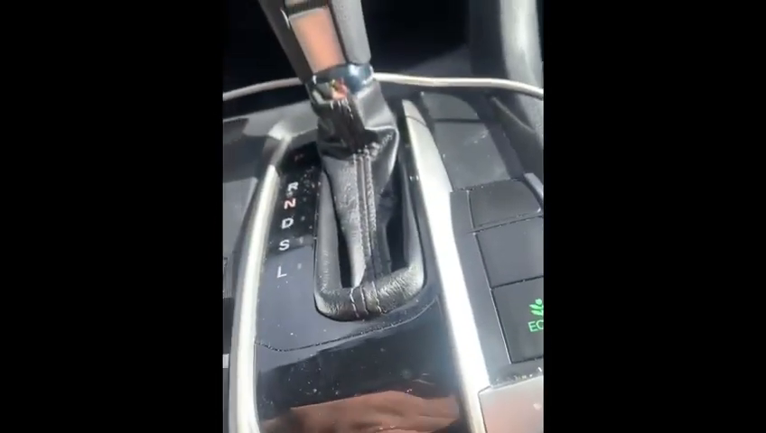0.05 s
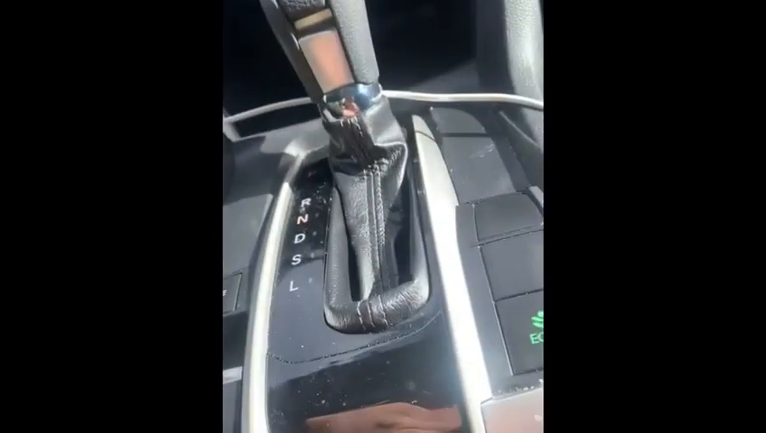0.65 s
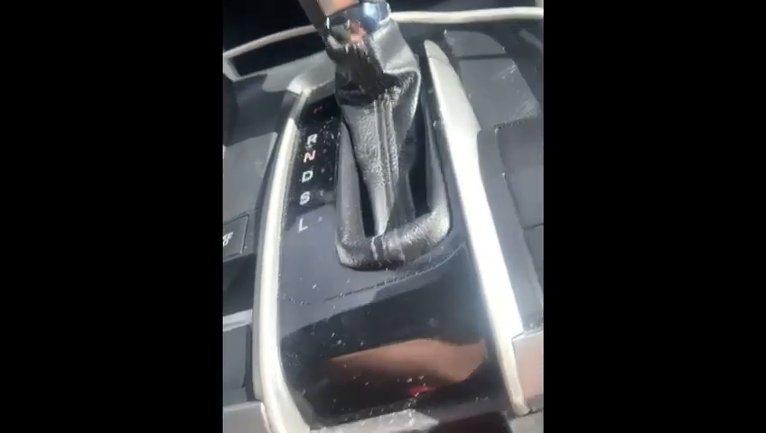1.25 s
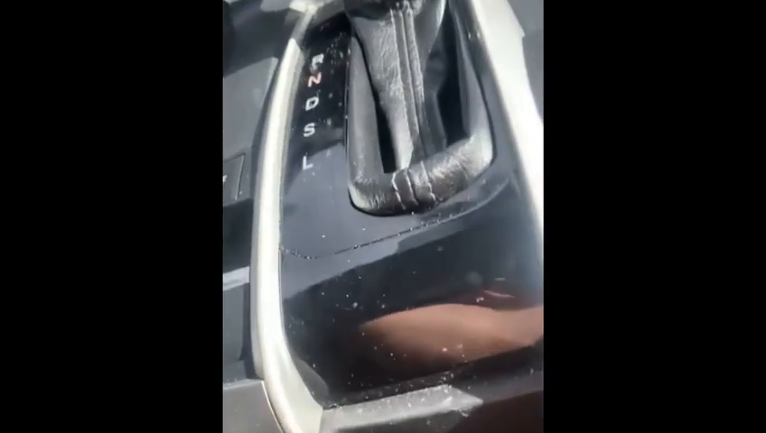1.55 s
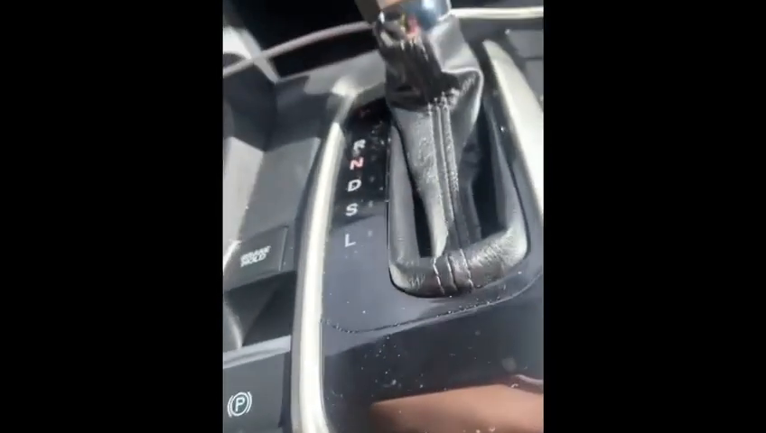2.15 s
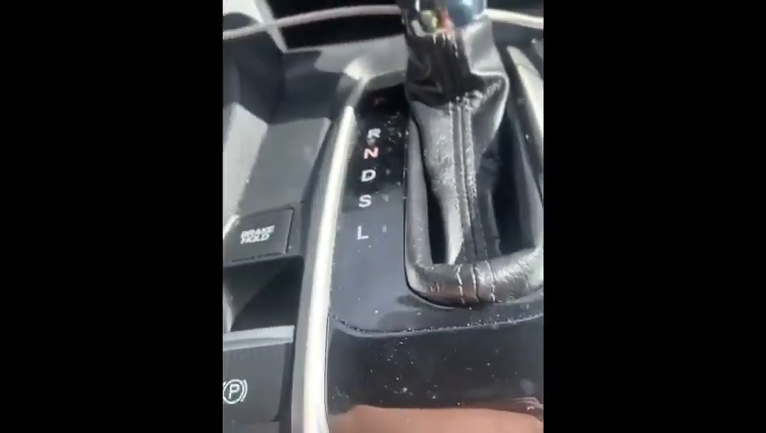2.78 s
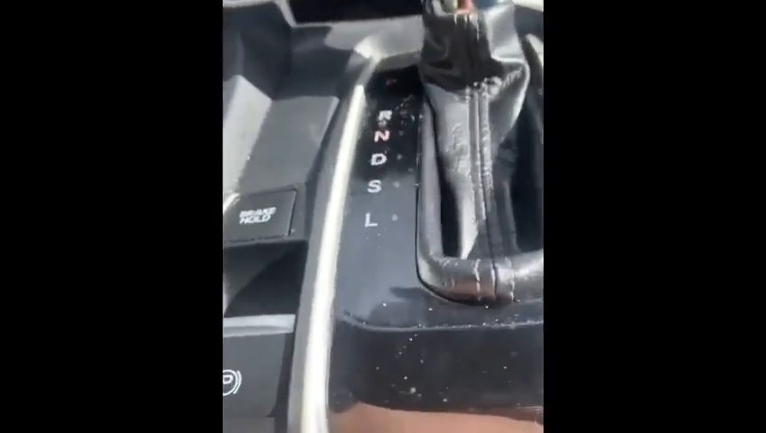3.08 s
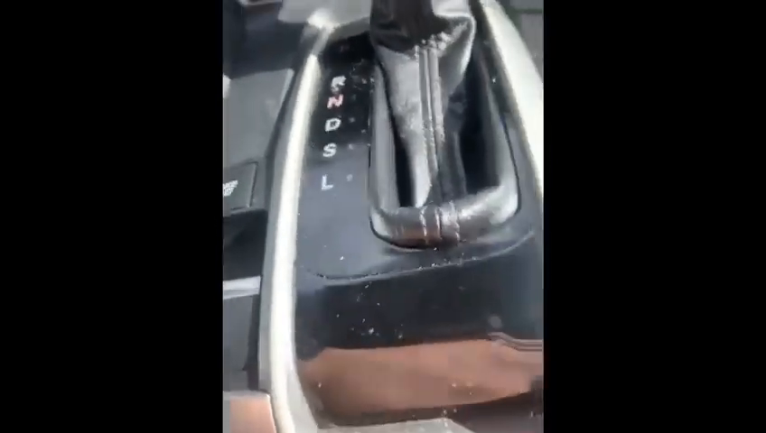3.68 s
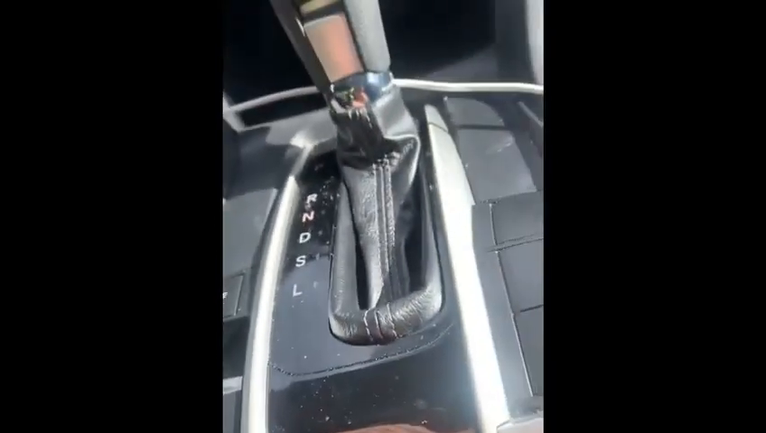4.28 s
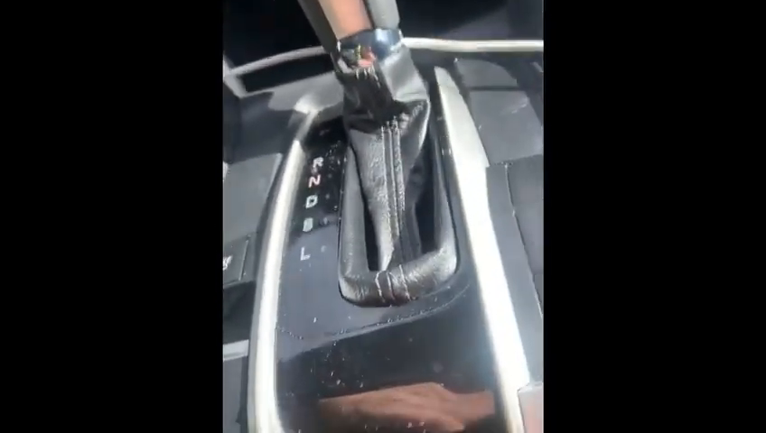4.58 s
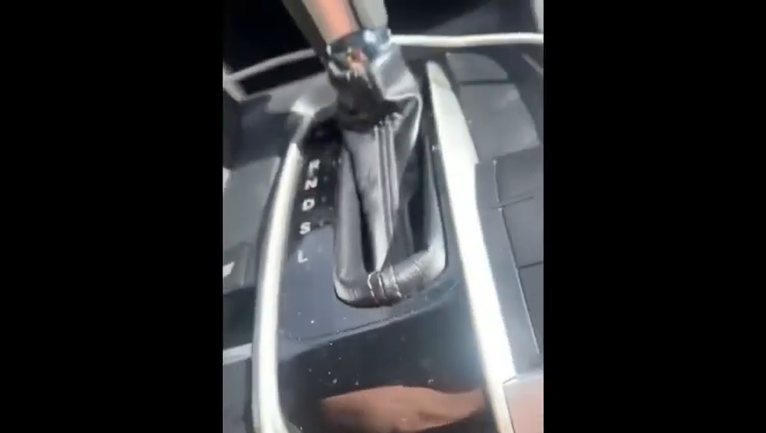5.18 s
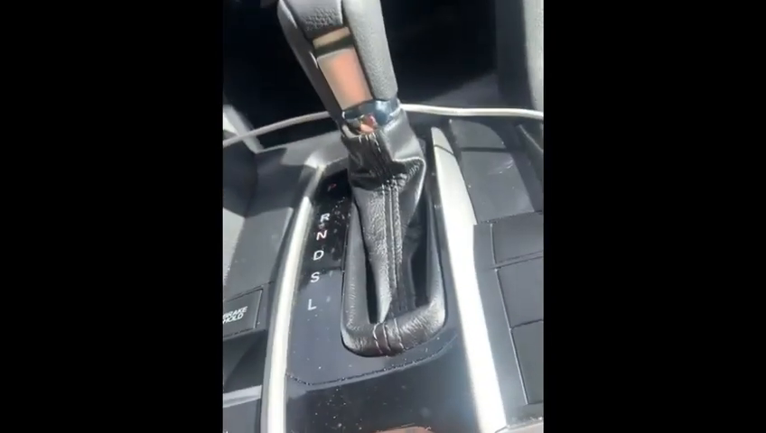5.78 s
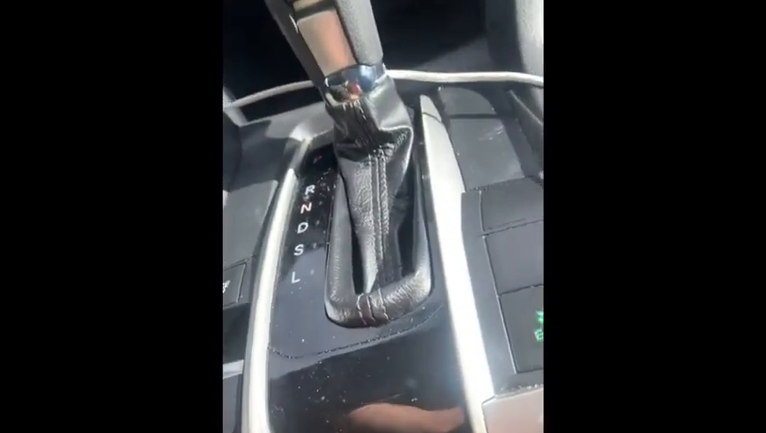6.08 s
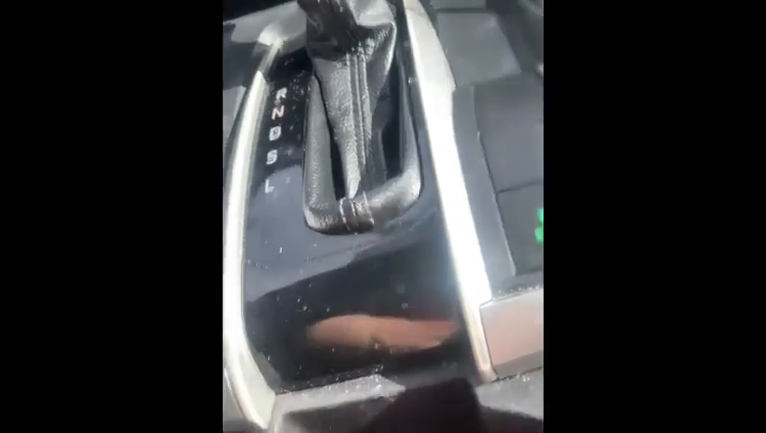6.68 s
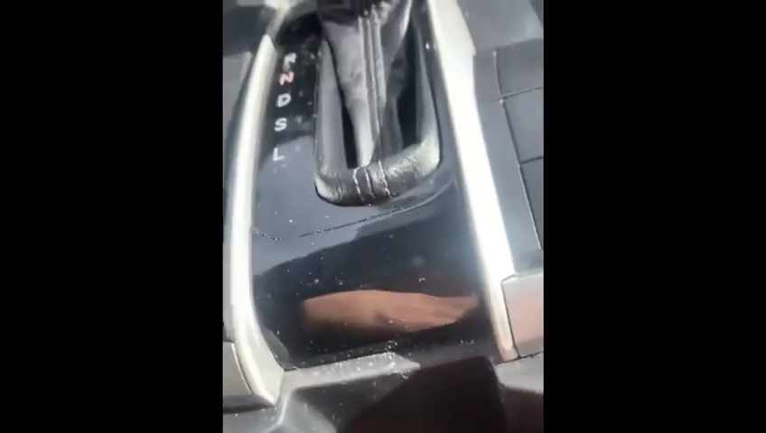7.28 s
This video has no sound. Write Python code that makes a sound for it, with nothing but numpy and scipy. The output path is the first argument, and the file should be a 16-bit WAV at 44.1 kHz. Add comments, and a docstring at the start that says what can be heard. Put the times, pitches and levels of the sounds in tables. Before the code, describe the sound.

Close, uneven clicking and clacking of a car gear shifter and its release button, with one hard clunk and faint leather rustling.

```python
"""A car's gear lever, worked by hand, close to a handheld microphone in the parked cabin.
Button and detent pawl click, ringing the plastic housing and console. The lever scrapes along its
gate, thumps into notches and once slams its end stop, booming the floor pan. The leather boot
rustles, the grip creaks and squeaks, the return spring rings. A faint rumble fills the cabin."""
import sys
import numpy as np
from scipy import signal
from scipy.fft import rfft, irfft, next_fast_len
from scipy.io import wavfile
from scipy.ndimage import map_coordinates

SR = 44100
rng = np.random.default_rng(int(sys.argv[2]) if len(sys.argv) > 2 else 0)


def output_pcm(signal):
    """Save a mono or channel-first signal as 16-bit PCM at the path in sys.argv[1].

    Samples are clipped to [-1, 1] before scaling.
    """
    pcm = np.clip(np.atleast_2d(signal).T, -1, 1) * 32767
    wavfile.write(sys.argv[1], SR, np.round(pcm).astype(np.int16))


N = 327920

# plastic lever housing: mode_hz, level_db, t60_s
HOUSING_MODES = [(862, -1, .08), (1000, -4, .05), (1136, 1, .07), (1310, -1, .05), (1430, -4, .05),
                 (1577, -3, .07), (1733, -4, .06), (1887, -2, .07), (2120, -2, .06), (2360, -3, .045),
                 (2650, -5, .04), (3070, 1, .06), (3204, 1, .055), (3632, -1, .055), (3845, -2, .055)]
# console under the housing: mode_hz, level_db, t60_s
CONSOLE_MODES = [(205, -4, .09), (268, -4, .09), (373, -4, .09), (450, -5, .06), (544, 2, .09),
                 (690, 1, .08)]
SIDES = np.array([[.5], [-.5]])  # splits a left-right difference between the microphone ports


def amp(db):
    """Decibels to gain."""
    return 10 ** (np.asarray(db) / 20)


def unit(x):
    """Scale to rms 1."""
    return x / np.sqrt(np.mean(x ** 2) + 1e-20)


def along(points, hz):
    """Interpolate (hz, value) points on a log frequency axis."""
    point_hz, values = np.transpose(points)
    return np.interp(np.log(hz + 1), np.log(point_hz + 1), values)


def timeline(points):
    """Interpolate (time_s, value) points at every sample."""
    return np.interp(np.arange(N) / SR, *np.transpose(points))


def wobble(rate_hz):
    """Smooth random curve, rate_hz knots a second."""
    knots = rng.standard_normal(int(N * rate_hz / SR) + 4)
    return map_coordinates(knots, [np.arange(N) * rate_hz / SR])


def filtered(x, response):
    """Apply a complex frequency response."""
    size = next_fast_len(N + SR // 2)
    return irfft(rfft(x, size) * response(np.fft.rfftfreq(size, 1 / SR)), size)[..., :N]


def band(x, lo_hz, hi_hz, order=3):
    """Causal band-pass."""
    return signal.sosfilt(signal.butter(order, [lo_hz, hi_hz], 'band', fs=SR, output='sos'), x)


def noise(size, apart):
    """Stereo noise: a common part plus an independent part per port."""
    z = rng.standard_normal((3, size))
    return unit(z[0] + apart * z[1:])


def ring(modes, t, scatter_db=0, detune=0, apart=0):
    """Damped modes at random phases; apart is the phase scatter per port in radians."""
    hz, db, t60_s = np.transpose(modes)[:, :, None]
    z = rng.standard_normal((5, len(modes), 1))
    phase = 2 * np.pi * (hz * (1 + detune * z[0]) * t + z[1]) + apart * z[2:4]
    return (amp(db + scatter_db * z[4] - 60 * t / t60_s) * np.sin(phase)).sum(1)


def mode(hz, t, t60_s, apart):
    """One damped stereo mode, rms 1."""
    return unit(np.sin(2 * np.pi * hz * t + apart * rng.standard_normal((2, 1))) * amp(-60 * t / t60_s))


def add(track, start_s, sound):
    """Mix a sound into the track."""
    start = max(round(start_s * SR), 0)
    part = sound[:, :N - start]
    track[:, start:start + part.shape[1]] += part


def cabin_rumble():
    """Low cabin noise, with a wavering drone that swells midway."""
    # rumble spectrum: freq_hz, gain_db
    spectrum = [(20, -9.5), (38, -2.5), (55, 7.5), (90, -2.5), (130, -2), (190, -15.5), (300, -24),
                (480, -23), (900, -37), (2000, -68.5)]
    # rumble envelope: time_s, level_db
    rumble_levels = [(0.0, -43.5), (0.25, -54), (0.64, -46.5), (0.93, -57.5), (2.53, -52), (2.8, -56.5),
                     (3.36, -48.5), (3.77, -52), (4.12, -50), (4.33, -55), (5.73, -52), (6.15, -54.5),
                     (6.52, -54), (7.44, -48.5)]
    # drone envelope: time_s, level_db
    drone_levels = [(3.1, -78), (3.25, -48), (3.7, -61), (4.0, -47.5), (4.55, -43), (4.9, -60.5),
                    (5.4, -73.5)]
    rumble = unit(filtered(noise(N, apart=1), lambda hz: amp(along(spectrum, hz))))
    drone_hz = 54 + .25 * wobble(3)
    drone = np.sin(2 * np.pi * np.cumsum(drone_hz) / SR)
    return amp(timeline(rumble_levels) + 3.5) * rumble + amp(timeline(drone_levels) + 4) * drone


def rub_gains():
    """Rustle and hiss gains of the boot: each rub swells, holds and dies away."""
    # hand creasing the boot: start_s, end_s, rustle_db, hiss_db
    rubs = [(0.02, 0.379, -55, -70), (0.72, 0.944, -54, -71), (1.129, 1.45, -62, -77),
            (1.5, 1.63, -58.5, -76.5), (2.219, 2.478, -69.5, -84), (3.08, 3.657, -63.5, -85.5),
            (3.7, 3.822, -55.5, -64.5), (3.849, 4.025, -50.5, -60.5), (4.099, 4.296, -54.5, -65),
            (4.533, 4.822, -60, -71.5), (4.934, 5.133, -54, -63), (5.19, 5.366, -62, -69),
            (5.418, 5.56, -53, -60), (5.66, 5.78, -65, -83), (5.83, 6.106, -57, -71.5),
            (6.3, 6.42, -52.5, -66), (6.52, 6.787, -56, -72.5), (7.18, 7.23, -52, -66)]
    attack_s, release_s = .035, .04
    t = np.arange(N) / SR
    rustle, hiss = amp(-80.5), amp(-85)  # hand still
    for start_s, end_s, rustle_db, hiss_db in rubs:
        envelope = np.exp(-np.maximum(start_s - t, 0) / attack_s - np.maximum(t - end_s, 0) / release_s)
        rustle = np.hypot(rustle, amp(rustle_db) * envelope)
        hiss = np.hypot(hiss, amp(hiss_db) * envelope)
    return rustle, hiss


def leather_boot():
    """The boot rustles and crinkles under the hand."""
    # leather rustle spectrum: freq_hz, gain_db
    spectrum = [(150, -3.5), (400, 4), (800, -2.5), (1200, 0), (2200, -4), (3500, -8.5), (4600, -21),
                (6000, -15.5)]
    rustle_gain, hiss_gain = rub_gains()
    creases = amp(2 * wobble(400) + 1.6 * wobble(35) + 1.7 * wobble(9))
    rustle = unit(filtered(creases * noise(N, apart=.13), lambda hz: amp(along(spectrum, hz))))
    hiss = unit(band(creases * noise(N, apart=.05), 8400, 16000))
    return amp(2.5) * rustle_gain * rustle + amp(15.5) * hiss_gain * hiss


def grip_creaks(count=110):
    """Tiny random taps of the shifting grip, louder while the leather rustles."""
    out, t = np.zeros((2, N)), np.arange(SR // 14) / SR
    rustle_gain, _ = rub_gains()
    for when, size, brightness in rng.random((count, 3)):
        at = int(when * (N - 1))
        housing = unit(band(ring(HOUSING_MODES, t, scatter_db=4, detune=.03, apart=.5), 700, 2000, 2))
        console = unit(ring(CONSOLE_MODES, t, scatter_db=5, detune=.02, apart=.5))
        tap = (brightness * housing + (1 - brightness) * console) * (1 - np.exp(-t / .001))
        add(out, at / SR, rustle_gain[at] * amp(-6 + 10 * size ** 2) * tap)
    return out


def lead_in(t, pan_db, tick_db, snap_db):
    """A faint swell of hiss leads into each click, as bright as the click that follows."""
    grit = noise(len(t), apart=.067)
    low = amp(pan_db) * unit(band(grit, 980, 2500, order=2))
    mid = amp(tick_db) * unit(band(grit, 1100, 4500))
    high = amp(snap_db) * unit(band(grit, 4500, 15000))
    return ((low + mid + high) * amp(-18 - 60 * t / .033))[:, ::-1]


def housing_blow(t):
    """A contact cracks, chatters and rings the housing."""
    crack = 3.5 * amp(-60 * t / .015) * noise(len(t), apart=.2)
    chatter = 1.05 * amp(-60 * t / .055) * noise(len(t), apart=.25)
    housing = .25 * ring(HOUSING_MODES, t, scatter_db=4, detune=.012, apart=.6)
    return (crack + chatter + housing) * (1 - np.exp(-t / .0004))


def console_knock(t, pitch_hz, rise_s=.0046):
    """The heavier console responds later; a deeper knock is also duller."""
    modes = ring(CONSOLE_MODES, t, scatter_db=4, detune=.021, apart=.81)
    panels = unit(band(modes, 100, 1.6 * pitch_hz, order=2))
    panels += 1.4 * mode(pitch_hz, t, t60_s=.085, apart=.4)
    padding = unit(band(noise(len(t), apart=.91), 140, 560) * amp(-60 * t / .11))
    return unit((1 - np.exp(-(t / rise_s) ** 2)) * (panels + .8 * padding))


def mount_thud(t, rise_s=.015):
    """Dull thud of a knock reaching the shifter's mount."""
    # shifter mount: mode_hz, level_db, t60_s
    mount_modes = [(70, -4, 0.044), (90, 4, 0.11), (122, -7.5, 0.36), (148, -2, 0.27)]
    return unit((1 - np.exp(-t / rise_s)) * ring(mount_modes, t, scatter_db=2, detune=.045, apart=.4))


def clicks():
    """Button, pawl and gate contacts excite housing, console and mount."""
    # contacts: start_s, level_db, knock_db, tick_db, snap_db, console_hz, housing_hz
    contacts = [(0.11, -21, -18, -4.5, -2, 539, 1650), (0.115, -10.5, -20, -9, -9.5, 511, 1128),
                (0.128, -10.5, -16, -2, -4, 646.5, 1282), (0.137, -13.5, -15, -8, -10.5, 617.5, 1200),
                (0.158, -14.5, -10, 0, 0.5, 541, 1042), (0.25, -15.5, -15.5, -2.5, -3, 646.6, 1070),
                (0.318, -33, -20.5, 2.5, -5, 663.6, 1561), (0.389, -28.5, -12.5, -20.5, -21, 658, 1163),
                (0.474, -18, -22.5, -9, -13, 562.6, 1322), (0.48, -16.5, -21, -10, -15, 513.5, 1343),
                (0.49, -23, -13.5, -16.5, -8.5, 657.4, 1359), (0.777, -9, -22, -7, -16, 699, 1094),
                (0.836, -33, -9, -8, -20, 614, 1443), (0.899, -30, -17.5, -7, -14, 684, 1123),
                (0.935, -16, -31, -7, -29.5, 683, 1167), (1.046, -27, -15.5, -14, -20, 543, 1552),
                (1.146, -41.5, -6, -17, -36, 339, 1150), (1.223, -43.5, -17, -8, -36, 626, 872.6),
                (1.337, -9, -22, -14.5, -16.5, 508, 1169), (1.347, -11.5, -19, -22, -25, 503, 848),
                (1.591, -23.5, -8.5, -13, -24.5, 517, 1451), (1.862, -21.5, -16.5, -11.5, -15, 429, 1085),
                (1.955, -18.5, -21.5, -13, -13.5, 279.4, 1512), (2.312, -24, -16.5, -7.5, -13, 470.6, 2225),
                (2.437, -22.5, -11.5, -10, -13, 215.5, 1068), (2.497, -37, -15.5, -8, -18.5, 617, 1690),
                (2.552, -56.5, 2.5, -21, -23.5, 539, 912), (2.6, -45.5, 4.5, -10.5, -19, 536, 834),
                (2.62, -52.5, 3, -10.5, -23.5, 474, 1410), (3.036, -58.5, 2.5, -22, -20.5, 509, 992),
                (3.148, -11, -12, -3.5, -6, 426.5, 1388), (3.153, -12.5, -3.5, -11.5, 0, 455, 1603),
                (3.161, -14.5, -4, -7.5, -6, 512.7, 1010), (3.175, -22.5, -2, -8, -5.5, 491, 1207),
                (3.421, -53.5, -1, -1, -26, 280, 980), (3.467, -43, -1, -27.5, -38, 388.5, 1617),
                (3.51, -46.5, -5, -26.5, -32, 376, 928), (3.728, -33, -12.5, -4.5, -1, 510, 1110),
                (3.791, -38, -25.5, -12, -14, 606, 969), (3.853, -29.5, -12, -4.5, -23, 573, 975),
                (3.978, -39, -1.5, 7, 9.5, 206.3, 1025), (4.166, -15.5, -17, -9, -19, 532.5, 1130),
                (4.212, -21, -10, -7.5, -10, 505.5, 1153), (4.227, -13.5, -14, -9.5, -14.5, 624, 2088),
                (4.301, -41, -16.5, -28, -34, 210, 1117), (4.494, -12.5, -28, -8, -10, 528, 1714),
                (4.655, -23, -13.5, -5.5, -12, 673, 1160), (4.706, -10, -14, -7.5, -2, 506.5, 1067),
                (4.71, -11.5, -14.5, -2.5, -6, 732, 1078), (4.971, -19.5, -16, 1.5, -2.5, 512, 1528),
                (4.984, -14, -18, -6.5, -10, 675, 1191), (5.088, -29, -18, -14, -30, 556, 1055),
                (5.205, -33, -30.5, -5, -7.5, 529, 1407), (5.34, -34, -16, -5.5, -13.5, 661, 1343),
                (5.485, -11, -21.5, -4.5, -9, 544, 1899), (5.524, -16.5, -7, -12, -12, 658, 1334),
                (5.574, -16, -11, -8.5, -11.5, 666, 2103), (5.58, -18.5, -8.5, -11, -15, 514, 875),
                (5.791, -36.5, -12.5, -21, -28, 520, 1020), (5.834, -30.5, -11, -12.5, -14.5, 530, 2074),
                (5.885, -39, -4.5, -13, -19, 516, 870), (6.226, -50, 9.5, 3.5, -2.5, 231, 1433),
                (6.266, -23.5, 2.5, -14, -13.5, 261.2, 1140), (6.338, -12.5, -16, -3.5, -2.5, 288, 1200),
                (6.37, -24.5, -14, -13, -16, 524, 1751), (6.533, -15, -16, -10, -13.5, 500, 1595),
                (6.556, -26, -8, -9, -12, 269.6, 2150), (6.686, -15, -8.5, -8, -14, 518, 1261),
                (6.716, -14, -10, -4, -9, 493.4, 1528), (6.784, -40.5, 3.5, -13, -7, 263, 942),
                (7.01, -16.5, -8.5, -9.5, -9.5, 500, 1031), (7.072, -9.5, -22.5, -6, -8.5, 460, 1619),
                (7.077, -10, -15.5, -20, -32, 281.2, 1888), (7.17, -23.5, -12, -12.5, -23, 492, 2240),
                (7.18, -25, -13, -14, -20, 292, 1109), (7.277, -20, -10.5, -16.5, -23.5, 549, 1110),
                (7.29, -19, -12.5, -9.5, -10, 396, 1111), (7.301, -22.5, -9.5, -13, -14.5, 258, 1110)]
    out, t = np.zeros((2, N)), np.arange(SR // 6) / SR
    lead_t = t[:SR // 30]
    pan_db = -7.5 * SIDES  # lever nearer the right port
    for start_s, level_db, knock_db, tick_db, snap_db, console_hz, housing_hz in contacts:
        blow = housing_blow(t)
        # the strike point decides which mode rings most
        main_mode = mode(housing_hz, t, t60_s=.046, apart=.21)
        clack = amp(-20.5 + pan_db) * unit(unit(band(blow, 780, 2100)) + .9 * main_mode)
        tick = amp(-14 + tick_db + .017 * pan_db) * unit(band(blow, 2200, 4500))
        snap = amp(-10.5 + snap_db) * unit(band(blow, 4000, 14000))
        knock = amp(-10.5 + knock_db + .1 * pan_db) * console_knock(t, console_hz)
        thud = amp(-23.5 + .77 * knock_db) * mount_thud(t)
        add(out, start_s, amp(level_db) * (clack + tick + snap + knock + thud))
        add(out, start_s - lead_t[-1], amp(level_db) * lead_in(lead_t, pan_db, tick_db, snap_db))
    return out


def notch_thumps(rise_s=.0028):
    """The lever seats in a notch under the hand's weight and jolts its mount."""
    # notch seatings: start_s, level_db, pitch_hz
    seatings = [(0.12, -36, 114.6), (1.357, -36.5, 96.3), (1.866, -35, 116.4), (1.961, -34, 120.1),
                (2.442, -35, 121.7), (3.979, -36.5, 170.8), (4.714, -23.5, 98.6), (4.99, -32.5, 83.4),
                (5.537, -36.5, 125), (6.692, -32.5, 115.4), (7.014, -28, 124.7), (7.294, -32.5, 91)]
    out, t = np.zeros((2, N)), np.arange(SR // 6) / SR
    for start_s, level_db, pitch_hz in seatings:
        thump = unit((1 - np.exp(-t / rise_s)) * mode(pitch_hz, t, t60_s=.1, apart=.3))
        add(out, start_s, amp(level_db - 8.5) * thump)
    return out


def gate_slides():
    """Dense tiny slips excite the gate's resonances and hiss along its edge."""
    # lever strokes: start_s, end_s, scrape_db, hiss_db
    strokes = [(0.274, 0.333, -32.5, -26), (.362, .408, -34.5, -47), (.475, .52, -27, -43),
               (0.508, 0.577, -30.5, -38), (.555, 0.674, -35, -44), (.72, .79, -33.5, -37.5),
               (.935, 0.979, -42, -49), (2.199, 2.37, -49.5, -45.5), (2.28, 2.33, -45.5, -38.5),
               (4.66, 4.77, -31.5, -34.5), (7.04, 7.119, -37, -32.5)]
    # gate resonances: centre_hz, width_hz, gain_db
    resonances = [(515, 90, 3), (670.3, 21, 9), (1130, 140, -3.5), (1830, 140, -5), (1670, 450, -6),
                  (2416, 390, -5), (2720, 97, -6.5), (3500, 67, -3.5), (3530, 220, -16)]

    def gate(hz):
        """Resonators summed with alternating sign."""
        return sum((-1) ** k * amp(db) * 1j * hz * width / (centre ** 2 - hz ** 2 + 1j * hz * width)
                   for k, (centre, width, db) in enumerate(resonances))

    t, scrape_gain, hiss_gain = np.arange(N) / SR, np.zeros(N), np.zeros(N)
    for start_s, end_s, scrape_db, hiss_db in strokes:
        envelope = np.sin(np.pi * np.clip((t - start_s) / (end_s - start_s), 0, 1))
        scrape_gain += amp(scrape_db) * envelope
        hiss_gain += amp(hiss_db) * envelope
    slips = noise(N, apart=.25) * amp(3.2 * wobble(600) + 1.7 * wobble(60))
    return scrape_gain * unit(filtered(slips, gate)) + hiss_gain * unit(band(slips, 7000, 13000, order=2))


def grip_squeak(peak_s=.299, width_s=.009, pitch_hz=2440):
    """Brief stick-slip of plastic on plastic."""
    t = np.arange(N) / SR
    tone = np.sin(2 * np.pi * pitch_hz * t + .5 * wobble(180))
    grit = unit(band(noise(N, apart=.22), 2500, 12000, order=2))
    envelope = np.exp(-((t - peak_s) / width_s) ** 2)
    return amp(-25) * envelope * (tone + .17 * grit)


def return_spring():
    """The spring rings faintly after the button is released."""
    # spring plucks: start_s, level_db
    plucks = [(1.863, -56), (1.951, -55.5)]
    # spring coil: mode_hz, level_db, t60_s
    coil_modes = [(1206, 1, 0.5), (1770, -8, 0.43)]
    out, t = np.zeros((2, N)), np.arange(SR // 2) / SR
    for start_s, level_db in plucks:
        add(out, start_s, amp(level_db + 3) * ring(coil_modes, t))
    return out


def end_stop(start_s=3.158):
    """The lever slams home: the floor pan booms, loose trim rattles, the rod rings on."""
    # floor pan: mode_hz, level_db, t60_s
    pan_modes = [(58, 0, .13), (80, -5, .11), (373, -9, .08), (530, -5, .11), (692, -4, .11),
                 (862, -8, .08), (1120, -8, .06)]
    # steel lever rod: mode_hz, level_db, t60_s
    rod_modes = [(1000, -48.5, 1), (2280, -49.5, .6)]
    out, t = np.zeros((2, N)), np.arange(SR // 2) / SR
    boom = ring(pan_modes, t, apart=.15) * (1 - np.exp(-t / .004))
    trim = unit(band(noise(len(t), apart=.6), 590, 910, order=2)) * amp(-60 * t / .062)
    add(out, start_s, amp(-6) * (boom + amp(-11.5) * trim + ring(rod_modes, t)))
    return out


def cabin_reverb(x, t60_s=.24):
    """Short, dull reflections of an upholstered cabin."""
    t = np.arange(SR // 3) / SR
    envelope = amp(-60 * t / t60_s) * (1 - np.exp(-t / .013))
    tail = band(rng.standard_normal((2, len(t))), 150, 3200, order=1) * envelope
    return signal.fftconvolve(x, tail / np.linalg.norm(tail[0]), axes=1)[:, :N]


def scene():
    """Lever blows, their reflections, and quieter sounds favouring the right port."""
    # port balance: freq_hz, left_minus_right_db
    balance = [(100, -1), (280, 0.5), (500, -2.5), (800, 0.5), (1150, -11), (1800, 1.5), (2150, -0.5),
               (2700, 0.5), (4000, -1)]
    blows = clicks() + notch_thumps() + end_stop()
    quiet = return_spring() + gate_slides() + grip_squeak() + grip_creaks()
    quiet += leather_boot() + cabin_rumble()
    quiet = filtered(quiet, lambda hz: amp(SIDES * along(balance, hz)))
    return blows + amp(-37) * cabin_reverb(blows) + quiet


def record(dry):
    """Two spaced ports hear different phases; the treble is dulled and the loudest peaks clip."""
    # port phase difference: freq_hz, left_lead_rad
    port_phase = [(40, 1.6), (120, 2.1), (250, 1.8), (400, 1.9), (650, 1.6), (1000, 1.6), (1400, .7),
                  (1700, 1.5), (2100, 2.25), (2600, 1.7), (3400, .8), (3900, 1.6), (4500, 3), (5400, 4),
                  (6300, 5.9), (7300, 6.6), (8800, 9.3), (9600, 10.3), (10300, 12.3), (11500, 12.9)]
    # treble roll-off: freq_hz, gain_db
    rolloff = [(3500, 0.5), (6000, 0.5), (8000, -8.5), (11500, -11.5), (12300, -32), (13000, -34)]
    top_hz, taper_hz = 12700, 500
    ports = filtered(dry, lambda hz: amp(along(rolloff, hz)) * np.exp(1j * SIDES * along(port_phase, hz)))
    return filtered(np.clip(ports, -.9, .9), lambda hz: np.clip((top_hz - hz) / taper_hz, 0, 1))


dry = scene()
out = record(dry)
output_pcm(out)
```